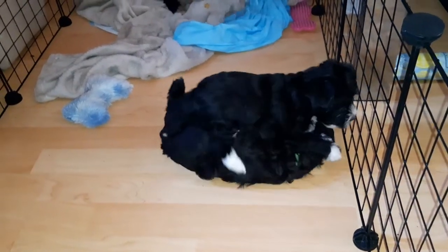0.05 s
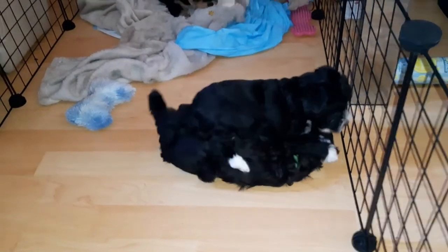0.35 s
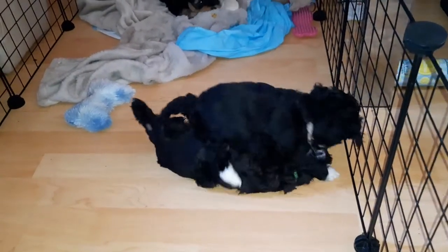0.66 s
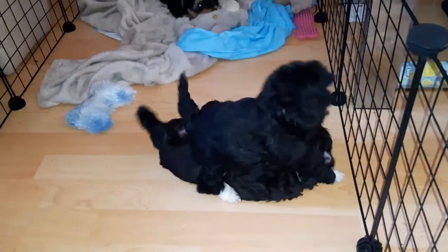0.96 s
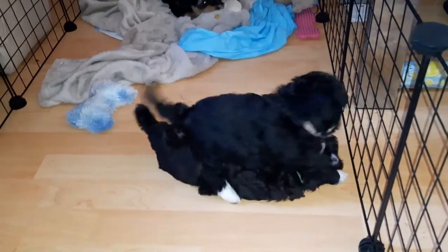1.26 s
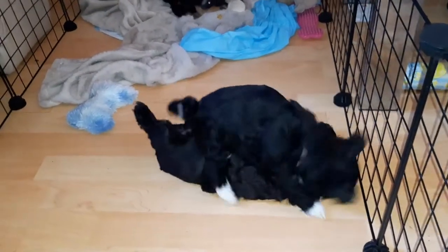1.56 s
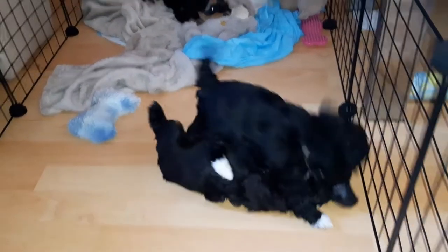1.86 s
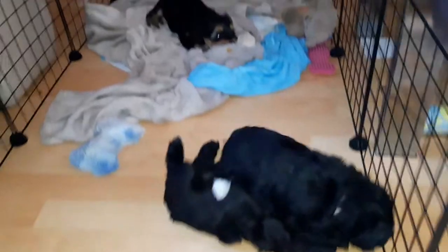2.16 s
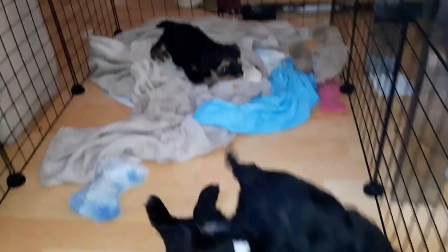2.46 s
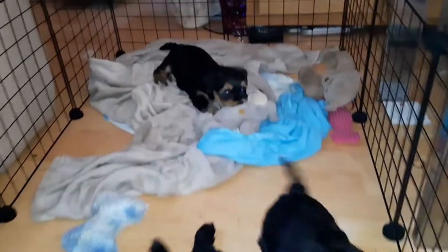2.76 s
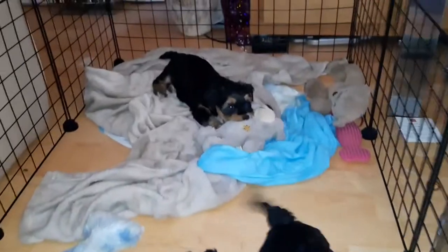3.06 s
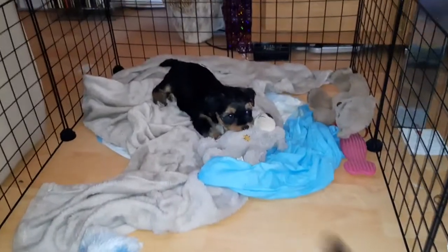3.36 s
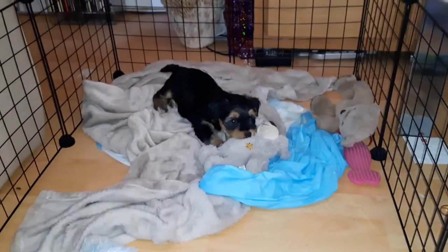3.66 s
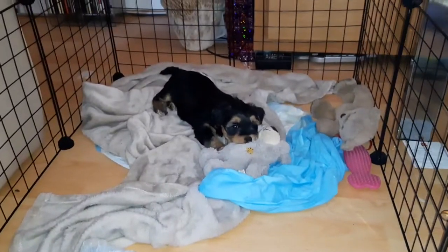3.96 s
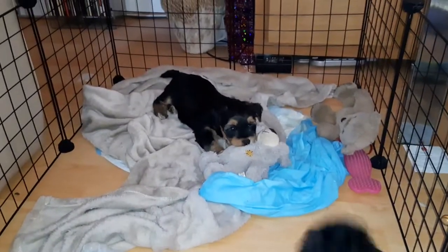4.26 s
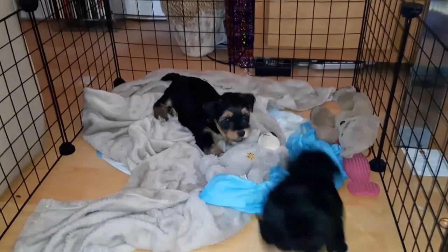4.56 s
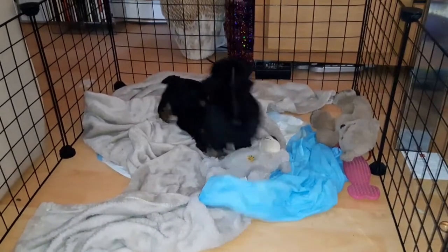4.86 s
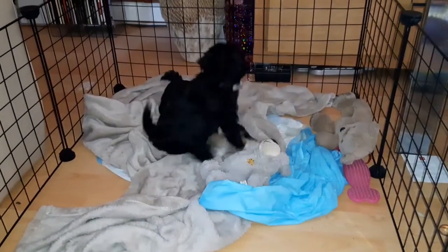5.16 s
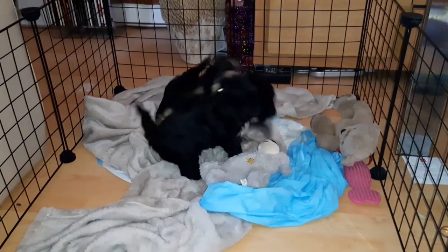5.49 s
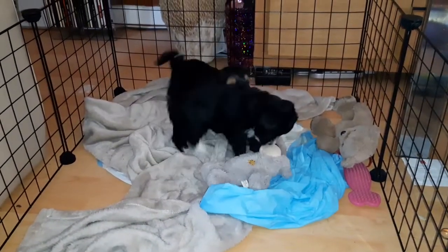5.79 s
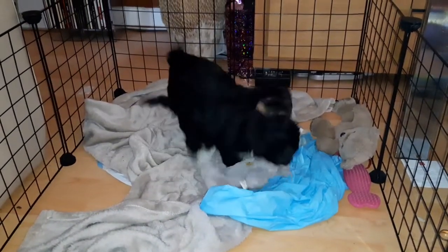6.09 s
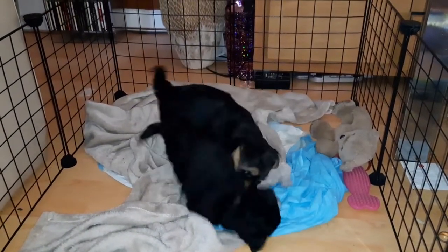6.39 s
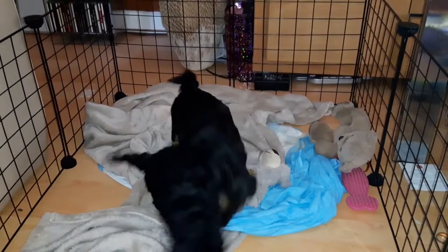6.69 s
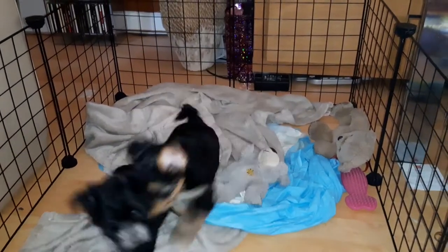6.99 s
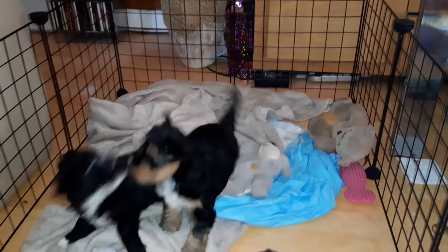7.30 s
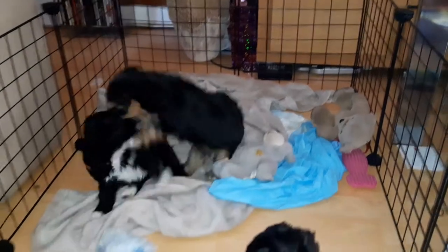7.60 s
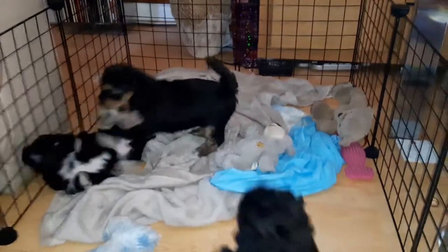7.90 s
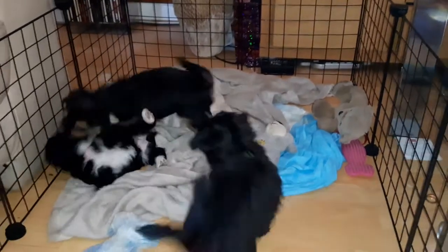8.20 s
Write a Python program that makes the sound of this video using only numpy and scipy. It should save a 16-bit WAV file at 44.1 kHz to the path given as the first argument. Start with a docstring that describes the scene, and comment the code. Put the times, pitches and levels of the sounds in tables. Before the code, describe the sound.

Young puppies play close by in a small, quiet room, their cries slightly to the right. High, strained whines fill the first 1.2 seconds, with a few paw knocks on a hard floor. Shorter whimpers come at about 1.6, 2.1 and 3 seconds, with faint nose whistles and sliding scuffs. From about 2.7 to 4.6 seconds claws tick and paws patter, with two faint wire ticks near 3.5, then a soft bump and a falling whine at 4.6. A thin, very high whistle leads into the clearest squeaks around 5.6 to 6.1 seconds. Softer whimpers, scuffling and tiny low growls follow from 6.3 to 7.7. At about 7.8 seconds a puppy tumbles with a quick cluster of thuds and the wire pen rattles, the loudest moment. A rough whimper and a short growl finish it just after 8 seconds.

```python
"""Puppies wrestling in a wire pen

Young puppies tussle on a laminate floor in a small room. Their vibrating vocal folds give high whines
and short growls, and air forced through the nose adds thin whistles around some cries. Paws and bodies
knock and scuff on the boards; near the end a puppy bumps the pen and its wire panels rattle."""
import sys
import numpy as np
from scipy import signal
from scipy.fft import rfft, irfft, next_fast_len
from scipy.io import wavfile
from scipy.ndimage import map_coordinates

SR = 44100
rng = np.random.default_rng(int(sys.argv[2]) if len(sys.argv) > 2 else 0)


def master(y):
    """Save y as 16-bit WAV."""
    cut = np.clip(np.atleast_2d(y).T, -1, 1)
    pcm = np.round(cut * 32767)  # scale
    wavfile.write(sys.argv[1], SR, pcm.astype(np.int16))


N = 363384
T = np.arange(N) / SR
TOP_HZ = 15800


# A second, slower vibration of the folds in three cries, one curve each.
# Each point: time in seconds, rate in Hz, depth from 0 to 1.
STRAIN = [
    [(.165, 706.6, 0), (.23, 354.7, 0.94), (.44, 273, 1)],
    [(.67, 302, 0.02), (.94, 299.6, 0.34), (.99, 593, 0.07), (1.16, 573, 0.22)],
    [(8.02, 609, 0.09), (8.14, 571, 0.52)],
]
# Resonances of throat and muzzle. Each row: frequency in Hz, gain in dB.
THROAT = [(2300, -15), (3300, -8), (4300, -7), (5800, -2), (8700, -5), (11000, -3), (12400, 3), (13500, -2),
          (15500, -6)]
# Notes; a long cry joins two. Each row: start and length in seconds, first, middle and last pitch in Hz,
# level and its change over the note in dB, octave and upper overtones in dB relative to the fundamental,
# shrill resonance in Hz, roughness from 0 to 1.
NOTES = [ (0.0, 0.19, 1665, 1473, 1323, -34.5, -8, -26.5, -28, 10300, 0.02),
         (0.169, 0.26, 1314, 1289, 1226, -34.5, -5.5, -24, -30.5, 3860, 0.24),
         (0.671, 0.29, 1063, 1080, 1126, -37, -3, -19.5, -40.5, 5330, 0.34),
         (0.947, 0.21, 1163, 1187, 1165, -37.5, -0.5, -17, -32, 4500, 0.08),
         (1.575, 0.057, 1293, 1323, 1560, -46.5, -7.5, -25, -32, 4040, 0.07),
         (2.129, 0.27, 1217, 1170, 1026, -40, -1, -16.5, -34, 4830, 0.08),
         (2.956, 0.14, 1208, 1183, 1270, -36.5, 3.5, -9, -33.5, 5100, 0.12),
         (3.107, 0.15, 1335, 1252, 1189, -43, -12, -19.5, -34, 5050, 0.09),
         (3.966, 0.064, 1190, 1174, 1150, -51.5, -9.5, -34, -37.5, 9300, 0.08),
         (4.589, 0.18, 1358, 1282, 1077, -40, -1.5, -18.5, -25, 5130, 0.2),
         (5.718, 0.15, 1840, 1588, 1513, -30, -6, -24.5, -28, 6200, 0.02),
         (5.864, 0.113, 1526, 1434, 1365, -28.5, 1.5, -38, -27.5, 5700, 0.03),
         (5.98, .175, 1175, 1540, 1515, -38.5, -16, -21, -28.5, 5100, 0.05),
         (6.555, 0.16, 1544, 1457, 1424, -47, -4, -33, -31, 10600, 0.11),
         (6.667, .124, 1413, 1227, 1182, -40.5, -11.5, -9.5, -34.5, 5300, 0.13),
         (7.468, 0.2, 1562, 1599, 1515, -47.5, -11.5, -18, -24.5, 9500, 0.1),
         (7.965, 0.081, 1232, 1195, 1145, -43.5, -6, -1.5, -13, 4700, 0.2),
         (8.048, 0.1, 1111, 1065, 1000, -38.5, 3.5, -18, -36.5, 4305, 0.4), ]
def whines(upper_db=-1, rough_hiss_db=28, buzz_db=-15, skew=0.28, rasp=0.57,
           shrill_db=10, shrill_width_hz=420, fast_glide_hz_per_s=1800):
    """Source and filter: the muzzle shapes the folds' harmonics; modulation by strain adds sidebands."""
    slow_hz, depth = curves(sum(STRAIN, []))
    depth = depth * sum((T > cry[0][0]) & (T < cry[-1][0]) for cry in STRAIN)
    slow = 2 * np.pi * np.cumsum(slow_hz * (1 + 0.12 * wobble(200))) / SR
    shimmer, jitter = wobble(900), wobble(600)
    drift = .013 * wobble(110)
    quaver_db = 3.2 * wobble(120)
    hiss = air_hiss()
    out, cycle = np.zeros((2, N))
    for start, length, first_hz, middle_hz, last_hz, db, change, octave, upper, shrill_hz, rough in NOTES:
        i, pitch, loudness = note_shape(start, length, first_hz, middle_hz, last_hz, db, change)
        unsteady = np.clip(abs(first_hz - last_hz) / length / fast_glide_hz_per_s + 2 * rough, .3, 1)
        throb = 1 + depth[i] * np.cos(slow[i]) + rasp * rough * shimmer[i]
        # Loud cycles run slower, favouring the lower sideband.
        bend = rough * jitter[i] - skew * depth[i] * np.sin(slow[i])
        # A slurred note carries on from the phase of the one before.
        cycle[i] = cycle[i[0]] + 2 * np.pi * np.cumsum(pitch * (1 + unsteady * drift[i])) / SR
        phase = cycle[i] + bend
        quaver = unit(amp(unsteady * quaver_db[i]))
        voice = (np.sin(phase) + amp(octave) * np.sin(2 * phase)) * throb * quaver
        age = T[i] - T[i[0]]
        for k in range(3, 14):
            hz = k * pitch
            flutter_db = 5.5 * map_coordinates(rng.standard_normal(size=64), [age * 110], order=1)
            # The mouth's shape picks out one overtone.
            muzzle_db = along(THROAT, hz) + shrill_db * np.exp(-((hz - shrill_hz) / shrill_width_hz) ** 2)
            voice += amp(upper + upper_db + muzzle_db + flutter_db) * (hz < TOP_HZ) * np.sin(k * phase)
        buzz = amp(buzz_db) * np.sqrt(np.abs(depth[i])) * np.sin(slow[i])
        airflow = np.sqrt(np.hanning(len(i)))
        air = amp(upper + rough_hiss_db * rough) * (.5 + airflow) * hiss[i]
        out[i] += loudness * (np.sqrt(2) * voice + buzz + air)
    return out


# Notes ending near these times, in seconds, sag in pitch.
SAGS = [.432, 1.151, 2.39, 5.976, 8.149]
def note_shape(start, length, first_hz, middle_hz, last_hz, db, change_db,
               attack_s=.014, release_s=.0072, sag_s=.014, sag_hz=132):
    """A note's samples, pitch and loudness: a parabolic glide that may sag as the breath runs out."""
    end = start + length
    i = np.flatnonzero((T > start - attack_s / 2) & (T < end + release_s / 2))
    progress = np.clip((T[i] - start) / length, 0, 1)
    glide = np.polyval(np.polyfit([0, .5, 1], [first_hz, middle_hz, last_hz], 2), progress)
    sags = any(abs(s - end) < length / 2 for s in SAGS)
    pitch = glide - sags * sag_hz * np.exp((progress - 1) * length / sag_s)
    gate = np.clip((T[i] - start) / attack_s + .5, 0, 1) * np.clip((end - T[i]) / release_s + .5, 0, 1)
    return i, pitch, gate * amp(db + change_db * (progress - .5))


def air_hiss(tilt_db_per_octave=2.5):
    """Turbulence: broadband noise filtered by the resonances of throat and muzzle."""
    spectrum = [(hz, db + tilt_db_per_octave * np.log2(hz)) for hz, db in THROAT]
    return coloured(rng.standard_normal(N), spectrum)


# Nasal whistles. Each row: start and length in seconds, first and last pitch in Hz, level in dB.
WHISTLES = [(1.595, 0.16, 9330, 9050, -59), (2.867, 0.1, 9100, 10210, -61),
            (5.564, 0.0039, 12900, 13300, -55), (5.582, 0.069, 9300, 11800, -53.5),
            (5.641, 0.094, 12400, 12200, -36.5), (6.168, 0.016, 13660, 12600, -51),
            (6.442, 0.15, 9540, 10260, -52.5), (6.844, 0.045, 13600, 13070, -58),
            (7.378, 0.094, 10000, 10470, -49)]
def whistles(air_db=-6):
    """Flow-driven oscillation: air through the narrow nose sings a thin tone that glides and settles."""
    out = np.zeros(N)
    drift = 1 + .009 * wobble(260)
    air = amp(air_db) * air_hiss()
    for s, length, first_hz, last_hz, db in WHISTLES:
        i = np.flatnonzero((T >= s) & (T < s + length))
        progress = np.linspace(0, 1, len(i))
        pitch = (last_hz + (first_hz - last_hz) * (1 - progress) ** 2.8) * drift[i]
        tone = np.sqrt(2) * np.sin(2 * np.pi * np.cumsum(pitch) / SR)
        out[i] += amp(db) * np.sin(np.pi * progress) * (tone + air[i])
    return out


# Pitch of the growls and of one higher grunt. Each row: time in seconds, pitch in Hz.
GROWL_PITCH = [(4.6, 169.7), (5.3, 310.8), (6.3, 160.3), (7.8, 160.1), (8.15, 215)]
# Spectra of the chest and the open mouth. Each row: frequency in Hz, gain in dB.
CHEST = [(90, -55), (170, 4.5), (310, 4), (480, -12), (1200, -62)]
MOUTH = [(250, -2.5), (450, 6.5), (700, 5.5), (1100, -5), (1700, -0.5), (6000, -28)]
# Short growls. Each row: middle and half length in seconds, chest and mouth levels in dB.
GROWLS = [(4.55, 0.023, -58, -61), (5.305, 0.034, -62, -90), (6.325, 0.017, -49.5, -54.5),
          (6.4, 0.019, -50.5, -61.5), (6.774, 0.01, -48, -58.5), (7.093, 0.011, -47, -54.5),
          (7.669, 0.051, -43, -62.5), (7.741, 0.028, -37.5, -40.5), (8.215, 0.036, -43.5, -37.5)]
def growls():
    """Pulsed airflow: each cycle of a low, uneven hum in the chest also puffs air through the mouth."""
    pitch_hz, = curves(GROWL_PITCH)
    phase = 2 * np.pi * np.cumsum(pitch_hz * (1 + .06 * wobble(50))) / SR
    puffs = rng.standard_normal(N) * (1 + np.cos(phase))
    hum = (np.cos(phase) + .6 * np.cos(2 * phase)) * amp(2 * wobble(120))
    chest = unit(hum + .45 * coloured(puffs, CHEST))
    mouth = unit(coloured(puffs, MOUTH) + coloured(signal.sawtooth(phase), MOUTH))
    return sum(swell(s, half) * (amp(chest_db) * chest + amp(mouth_db) * mouth)
               for s, half, chest_db, mouth_db in GROWLS)


# Modes of the floorboards. Each row: frequency and bandwidth in Hz, gain in dB.
BOARD_MODES = [(303.4, 32, -2), (418, 92, -3), (595, 130, 5), (794, 267, -1.5)]
# Spectrum of scratching on the floor. Each row: frequency in Hz, gain in dB.
FRICTION = [(400, -4.5), (1100, -4.5), (2200, -3.5), (5500, -5), (9500, -10), (15500, -20)]
# Steps. Each row: start in seconds, claw and board peaks in dB.
PAWS = [(0.332, -44, -30), (1.051, -49, -37), (1.125, -52.5, -35), (2.132, -47.5, -37), (2.742, -40.5, -48),
        (2.827, -67, -44), (3.355, -46, -61), (3.381, -41.5, -41.5), (3.626, -36.5, -42),
        (3.756, -55, -43.5), (3.777, -55, -45), (3.841, -42.5, -27), (4.202, -45.5, -38.5),
        (4.215, -40.5, -44.5), (4.406, -42, -36), (4.417, -54, -38.5), (4.441, -45.5, -39.5),
        (4.636, -37.5, -31.5), (7.385, -53, -45.5), (7.489, -43, -50)]
def paws(claw_t60=0.038, pad_t60=0.025):
    """Impact excitation: a claw ticks and the pad rings the boards, tuned differently at each spot."""
    out, t = np.zeros((2, N)), np.arange(SR // 5) / SR
    for s, claw_db, board_db in PAWS:
        scratch = coloured(widen(rng.standard_normal((3, len(t))), width=1), FRICTION)
        claw = scratch * amp(-60 * t / claw_t60) * np.minimum(t / 0.0022, 1)
        tuning = rng.uniform(.9, 1.05)
        push = (t == 0) + 0.13 * rng.standard_normal(len(t)) * amp(-60 * t / pad_t60)
        wood = filtered(push, lambda hz: ringing(BOARD_MODES, hz * tuning))
        add(out, s, amp(claw_db) * claw / np.abs(claw.mean(0)).max())
        add(out, s, amp(board_db) * wood / np.abs(wood).max())
    return out


# Paws and fur sliding, bright on bare floor and duller on blankets.
# Each row: middle and half length in seconds, level in dB, centre of the rasp in Hz.
SCUFFS = [(2.372, 0.048, -50.5, 5760), (2.55, 0.064, -55.5, 5550), (2.672, 0.019, -58, 4580),
          (3.439, 0.0073, -50.5, 4650), (3.537, 0.028, -56.5, 9930), (4.494, 0.011, -47.5, 6850),
          (4.632, 0.17, -57, 5000), (4.838, 0.011, -46, 4650), (5.131, 0.082, -72, 5500),
          (6.407, 0.12, -57, 1930), (6.792, 0.054, -56.5, 3630), (6.987, 0.058, -62.5, 1880),
          (7.146, 0.052, -51, 2190), (7.757, 0.041, -49, 2480)]
# Bodies shifting on the boards. Each row: middle and half length in seconds, level in dB.
TUMBLES = [(1.2, 0.1, -64), (1.52, 0.05, -69), (3.78, 0.034, -54), (3.8, 0.54, -64), (4.67, 0.064, -46),
           (7.05, 0.029, -55), (7.43, 0.032, -55.5), (7.86, 0.045, -33), (8.0, 0.17, -43)]
def scuffs(rasp_db=1, rasp_octaves=0.42):
    """Stick-slip friction: sliding paws catch in fine grains, while shifting bodies drum the boards."""
    rub = coloured(grains(rate=7000, spread_db=3.5, width=1.06), FRICTION) * amp(2.2 * wobble(110))
    contacts = grains(rate=900, spread_db=-0.5, width=0.35)
    drumming = unit(filtered(contacts, lambda hz: ringing(BOARD_MODES, hz)))
    out = drumming * sum(amp(db) * swell(s, half) for s, half, db in TUMBLES)
    for s, half, db, rasp_hz in SCUFFS:
        loudness = amp(db) * swell(s, half)
        i = np.flatnonzero(np.abs(T - s) < np.pi * half)
        register = lambda hz: 1 + amp(rasp_db) * np.exp(-(np.log2((hz + 1) / rasp_hz) / rasp_octaves) ** 2)
        out[:, i] += loudness[i] * unit(filtered(rub[:, i], register))
    return out


# Deep floor modes. Each row: frequency and bandwidth in Hz, gain in dB.
JOIST_MODES = [(72, 20, -10), (157, 88, -0.5), (300, 43, 5.5)]
# A body lands on the floor or against the foot of the pen. Each row: start in seconds, peak in dB.
THUDS = [(4.636, -32), (7.845, -18), (7.856, -22.5), (7.88, -25), (7.911, -22), (7.955, -21)]
def thuds(settle_t60=0.081):
    """Modal response to a heavy impact: a puppy's weight shakes the joists as well as the boards."""
    out, t = np.zeros(N), np.arange(SR // 5) / SR
    for s, db in THUDS:
        push = (t == 0) + 0.045 * rng.standard_normal(len(t)) * amp(-60 * t / settle_t60)
        bump = filtered(push, lambda hz: ringing(BOARD_MODES, hz) + ringing(JOIST_MODES, hz))
        add(out, s, amp(db) * bump / np.abs(bump).max())
    return out


# Panel hits panel, and a claw plucks one wire. Each row: start in seconds, level in dB.
CLASHES = [(7.797, -41.5), (7.818, -29), (7.824, -22), (7.878, -30.5), (7.989, -30), (8.083, -35.5)]
PLUCKS = [(3.496, -46), (3.575, -48)]
# Spectrum of the chattering panels. Each row: frequency in Hz, gain in dB.
RATTLE = [(500, 0.5), (3100, -1), (4300, 5.5), (6900, 10), (8000, -2.5), (11800, -0.5), (15800, -4.5)]
def pen(ring_db=-22, ring_t60=0.33, rattle_t60=0.21, pluck_t60=0.041, crack_t60=.014):
    """Damped vibration: bumped panels chatter and their wires ring on; a paw soon stills a plucked wire."""
    out, t = np.zeros((2, N)), np.arange(SR // 2) / SR
    shake = np.zeros(N)
    chatter = grains(rate=16000, spread_db=2.8, width=2.7)
    for s, db in CLASHES:
        add(out, s, amp(db + ring_db - 60 * t / ring_t60) * wire(t))
        add(shake, s, amp(db) * (amp(-60 * t / crack_t60) + amp(-60 * t / rattle_t60)))
    for s, db in PLUCKS:
        add(out, s, amp(db - 60 * t / pluck_t60) * wire(t))
    return out + shake * coloured(chatter, RATTLE)


# Modes of one wire. Each row: frequency in Hz, level in dB.
WIRE_MODES = [(5426, -4), (6410, 3.5), (6650, -2), (6925, -9)]
def wire(t):
    """Superposition of modes: each touch finds a wire of slightly different pitch."""
    tuning = rng.uniform(.96, 1.04)
    return sum(amp(db + rng.normal(0, 3.5, (2, 1)))
               * np.sin(2 * np.pi * (tuning * hz * t + rng.random((2, 1)))) for hz, db in WIRE_MODES)


# Phase lag of a cry on the left. Each row: frequency in Hz, lag in radians.
LEFT_LAG = [(100, 0.14), (600, 0.33), (1200, 1.73), (2400, 4.56), (4500, 1.7)]
# Balance of a cry. Each row: frequency in Hz, left minus right in dB.
BALANCE = [(1200, 0.5), (1700, -8), (2400, -11.5), (5000, -2.5), (12000, -6.5)]
def from_right(x):
    """Phase and level differences: sound from the right reaches the left side later and weaker."""
    half = np.array([[.5], [-.5]])
    return filtered(x, lambda hz: amp(half * along(BALANCE, hz)) * np.exp(-1j * half * along(LEFT_LAG, hz)))


# Decay of the room. Each row: frequency in Hz, time to fall 60 dB in seconds.
ROOM_T60 = [(170, 0.22), (450, 0.54), (1100, 0.25), (8000, 0.34)]
def room(x):
    """Diffuse reverberation: a short, exponentially decaying tail for each ear, more alike in the bass."""
    hz, t, noise = signal.stft(rng.standard_normal((2, SR // 2)), SR, nperseg=256)
    apart = np.clip(hz / 1100, 0, 1)[:, None] * np.pi / 4
    ears = np.cos(apart) * noise[0] + np.array([1, -1])[:, None, None] * np.sin(apart) * noise[1]
    tail = signal.istft(ears * amp(-60 * t / along(ROOM_T60, hz)[:, None]), SR, nperseg=256)[1]
    tail = np.pad(tail / np.linalg.norm(tail[0]), ((0, 0), (SR // 250, 0)))  # arrives 4 ms late
    return signal.fftconvolve(np.atleast_2d(x), tail, axes=1)[:, :N]


# Spectrum of the quiet room. Each row: frequency in Hz, gain in dB.
AMBIENCE = [(87, -16.5), (190, -13), (320, -10), (700, -19.5), (15000, -34.5)]
def room_noise():
    """The noise floor: faint, steady and strongest in the bass."""
    return amp(-74.5) * coloured(widen(rng.standard_normal((3, N)), width=.8), AMBIENCE)


def amp(db):
    """Decibels as an amplitude ratio."""
    return 10 ** (np.asarray(db) / 20)


def unit(x):
    """Normalisation to rms 1."""
    return x / np.sqrt(np.mean(x ** 2) + 1e-20)


def along(points, hz):
    """Interpolation of (Hz, value) points on a log frequency axis."""
    frequencies, values = np.transpose(points)
    return np.interp(np.log(hz + 1), np.log(frequencies + 1), values)


def curves(rows):
    """Linear interpolation: one value per sample for each column after the time."""
    times, *columns = np.transpose(rows)
    return [np.interp(T, times, column) for column in columns]


def wobble(rate):
    """Random modulation: a smooth curve with rate knots a second."""
    return map_coordinates(rng.standard_normal(int(N * rate / SR) + 4), [T * rate], order=2)


def swell(s, half):
    """A Gaussian envelope around time s."""
    return np.exp(-np.minimum(((T - s) / half) ** 2, 20))


def filtered(x, response):
    """Linear filtering: the spectrum of x times a response of frequency."""
    n = x.shape[-1]
    padded = next_fast_len(n + 8192)
    return irfft(rfft(x, padded) * response(np.fft.rfftfreq(padded, 1 / SR)), padded)[..., :n]


def coloured(x, spectrum):
    """Spectral shaping: x through a (Hz, dB) curve, at rms 1."""
    return unit(filtered(x, lambda hz: amp(along(spectrum, hz))))


def ringing(modes, hz):
    """Resonance: the causal response of damped oscillators, summed with alternating sign."""
    return sum((-1) ** k * amp(db) * 1j * hz * width / (centre ** 2 - hz ** 2 + 1j * hz * width)
               for k, (centre, width, db) in enumerate(modes))


def grains(rate, spread_db, width):
    """Shot noise: tiny contacts of unequal size at random moments, in stereo."""
    shape = (3, N)
    contacts = (rng.random(shape) < rate / SR) * rng.standard_normal(shape)
    return widen(contacts * amp(spread_db * rng.standard_normal(shape)), width)


def widen(three, width):
    """Partial coherence: a common part, and a part of its own for each ear."""
    return (three[0] + width * three[1:]) / np.hypot(1, width)


def add(out, s, x):
    """Superposition: mix x into out at time s."""
    i = round(s * SR)
    out[..., i:i + x.shape[-1]] += x[..., :N - i]


def scene():
    """Direct and reverberant fields: cries and tussling, their echo, and the room's faint noise."""
    cries = from_right(whines() + whistles())
    tussle = growls() + paws() + scuffs() + thuds() + pen()
    return cries + tussle + room_noise() + room(amp(-12) * cries + amp(-1.5) * tussle)


def record(dry, low_cut_hz=54):
    """Band limiting: a third-order high-pass cuts deep rumble, and nothing passes above TOP_HZ."""
    return filtered(dry, lambda hz: (hz < TOP_HZ) * hz ** 3 / np.hypot(hz ** 3, low_cut_hz ** 3))


dry = scene()
out = record(dry)
master(out)
```